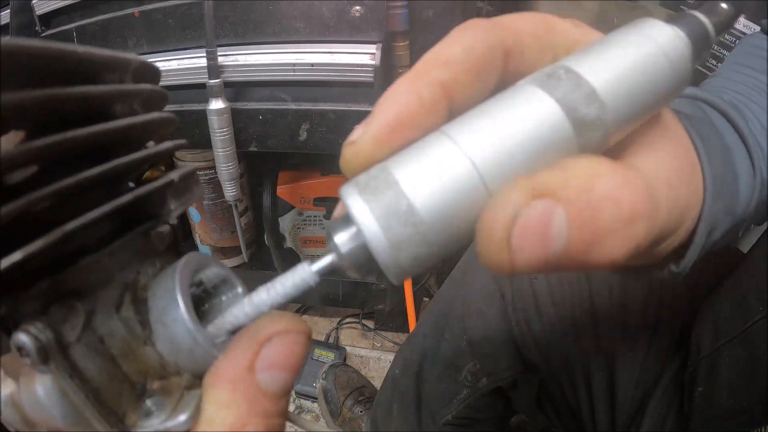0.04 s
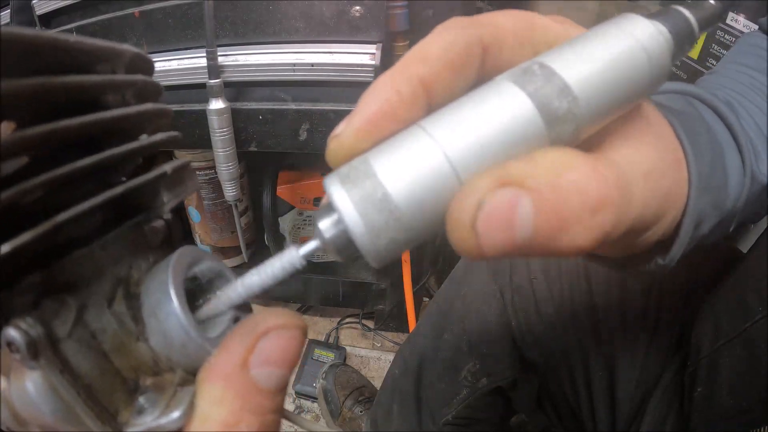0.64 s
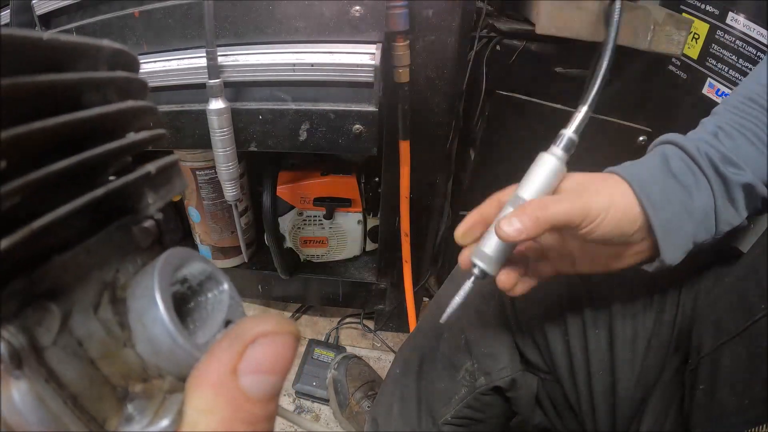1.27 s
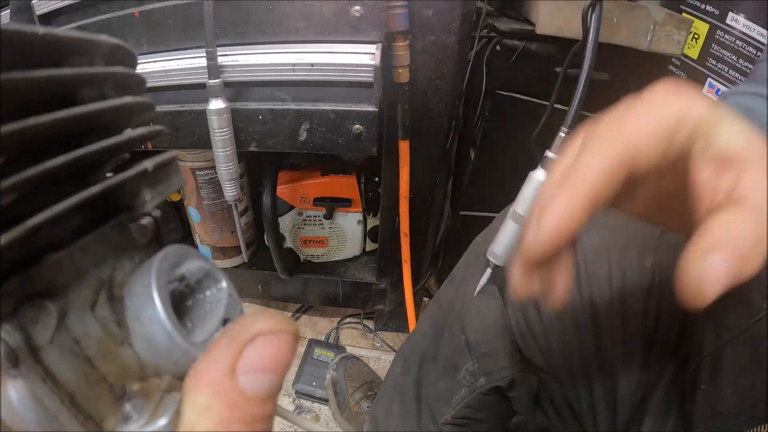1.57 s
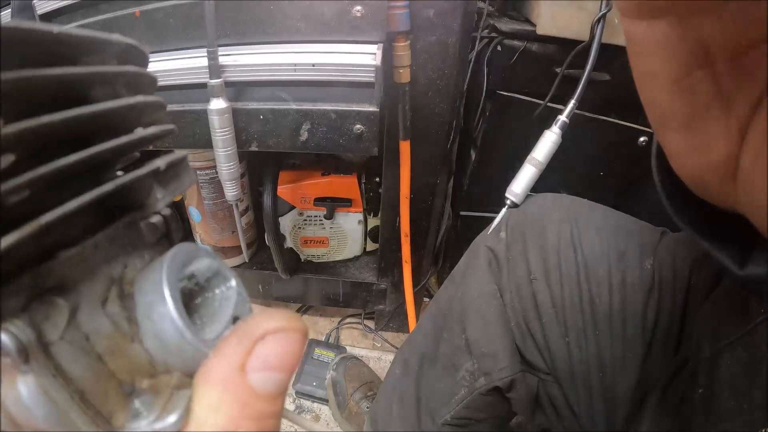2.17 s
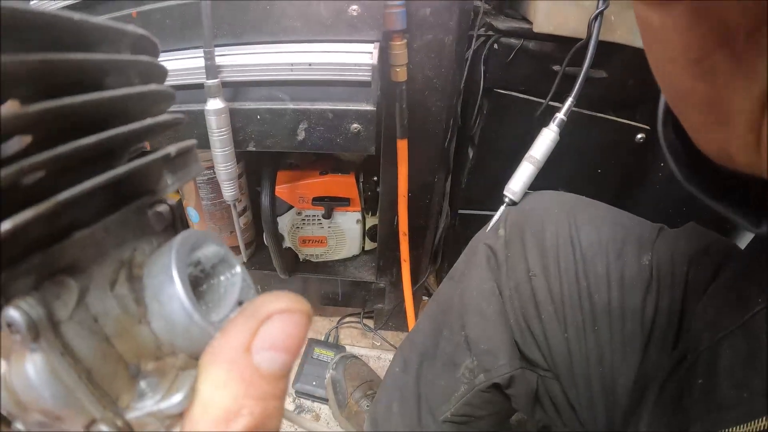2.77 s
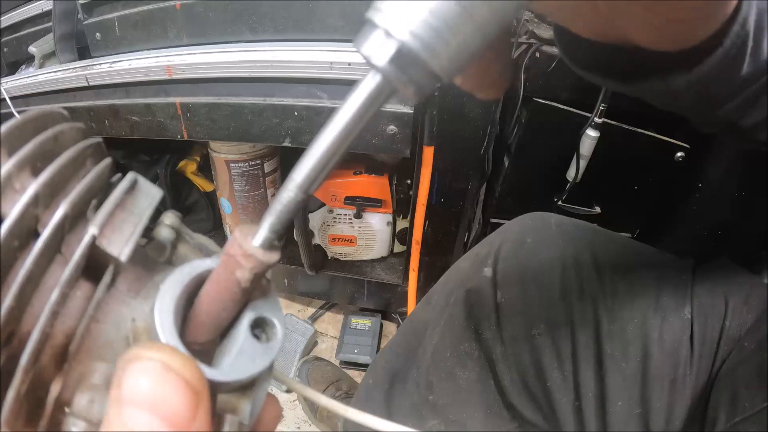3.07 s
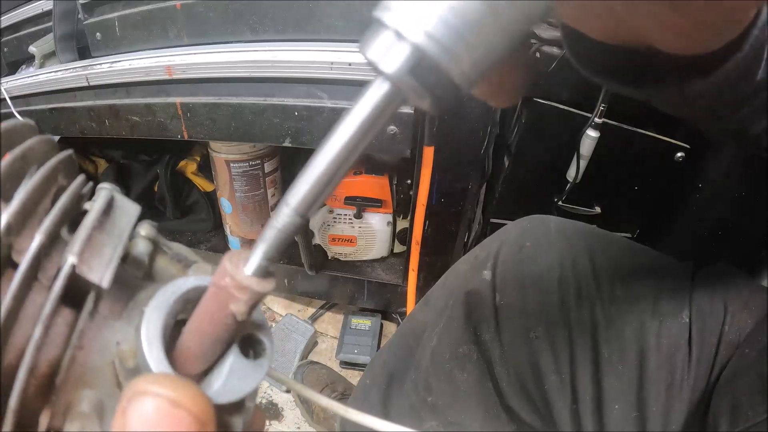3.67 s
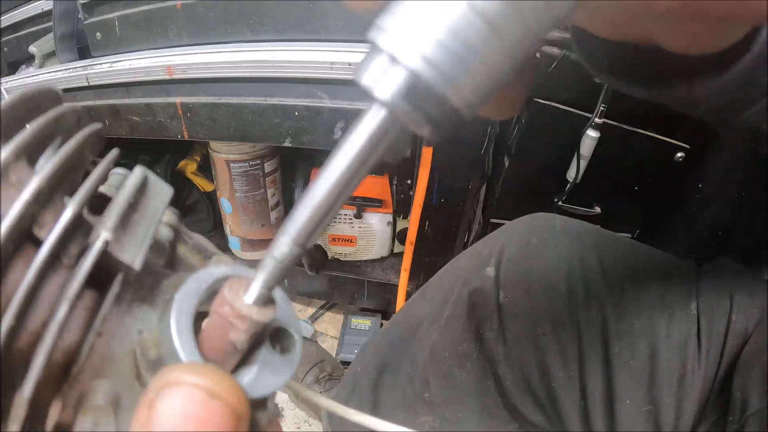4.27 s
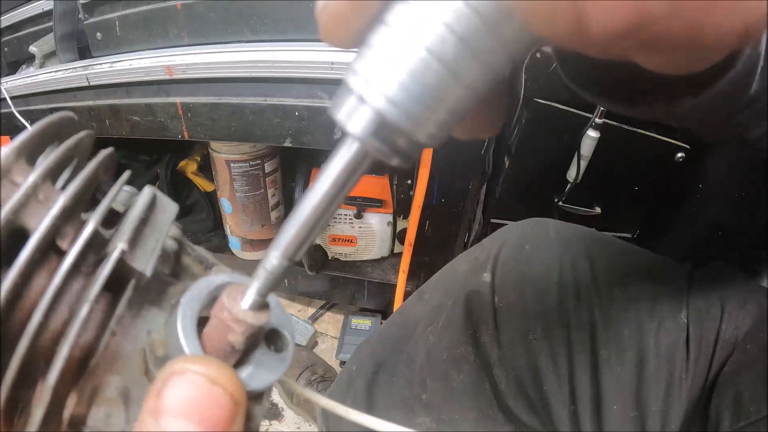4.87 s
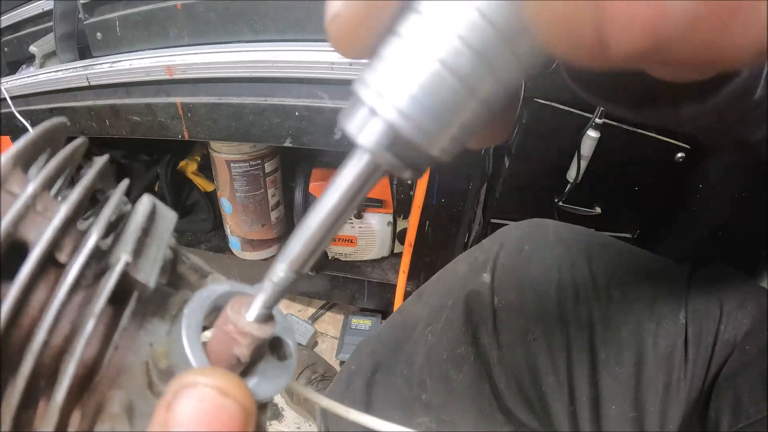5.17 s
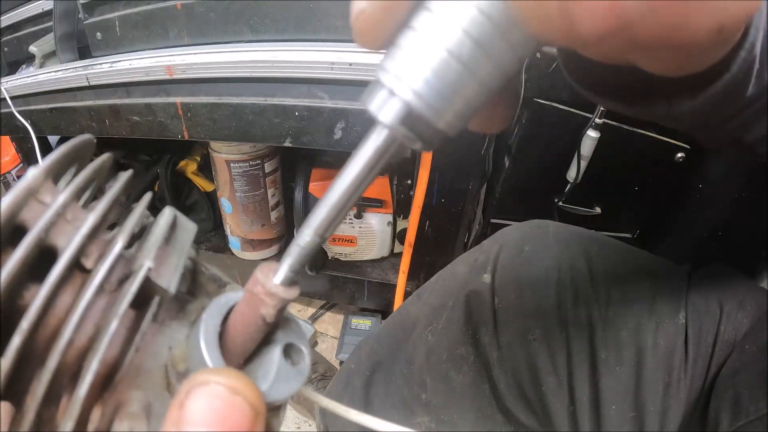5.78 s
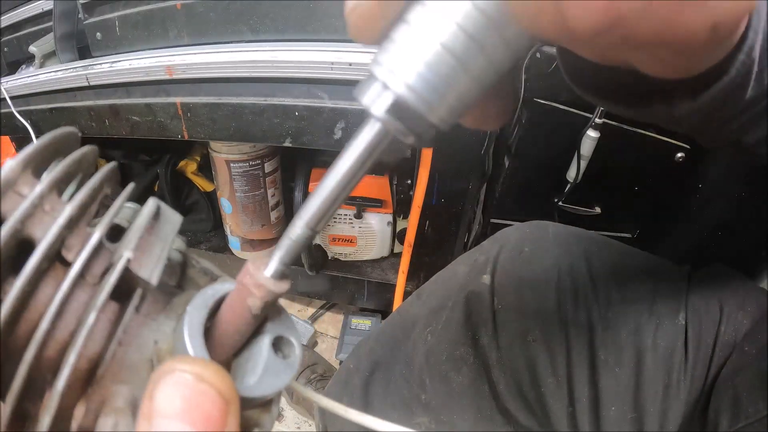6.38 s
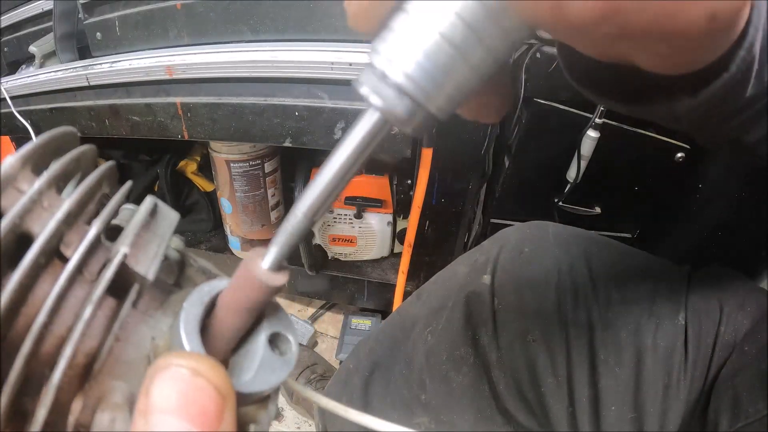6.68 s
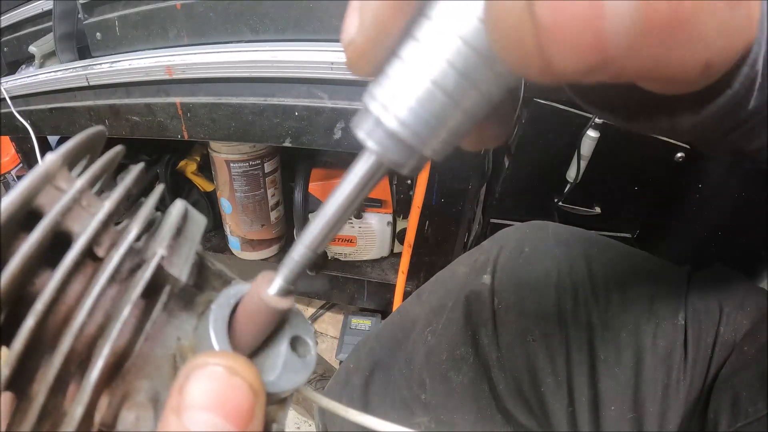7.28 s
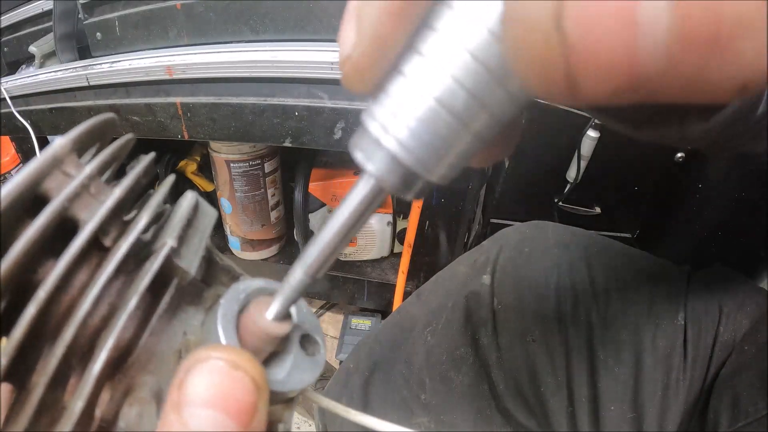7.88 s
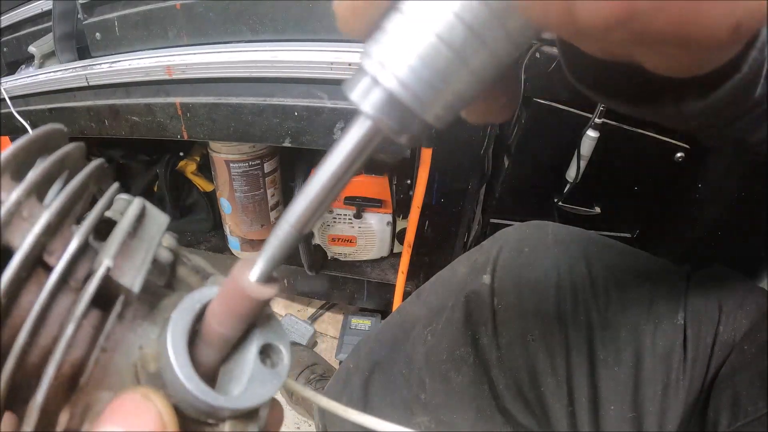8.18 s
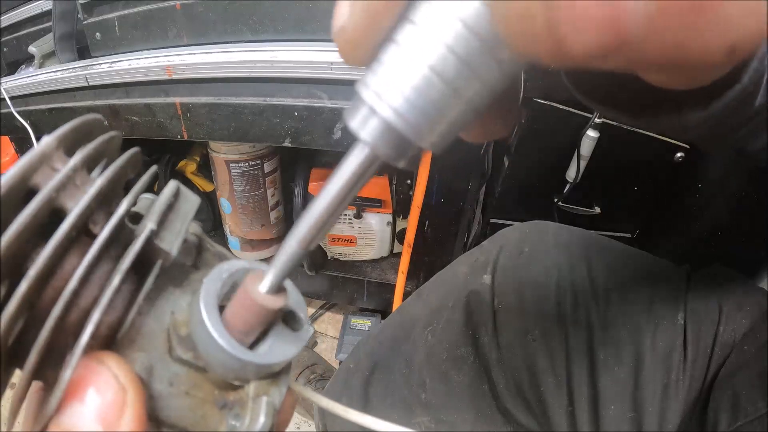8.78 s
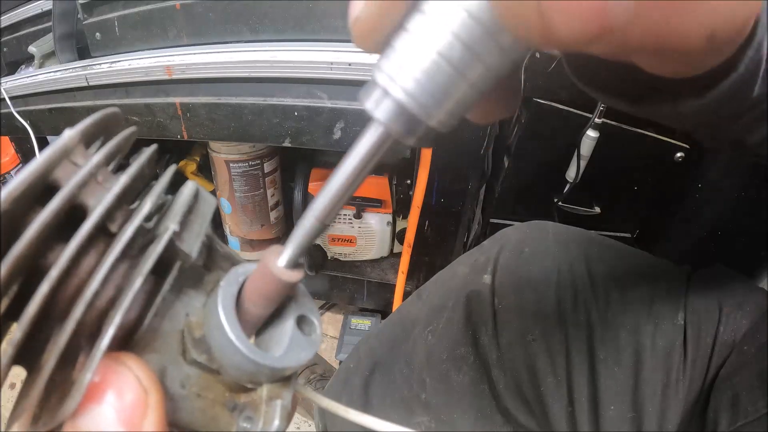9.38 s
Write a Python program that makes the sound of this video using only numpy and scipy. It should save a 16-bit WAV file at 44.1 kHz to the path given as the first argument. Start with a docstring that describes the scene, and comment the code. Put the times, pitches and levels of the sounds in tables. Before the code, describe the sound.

Close grinding on a finned metal cylinder, a pause with handling thumps and light scraping, then rough rotary sanding that squeals and chatters.

```python
"""Workshop, close to a head-worn camera: a flexible-shaft grinder works a finned engine cylinder's port.
A burr chips at the wall and lifts off, leaving the fins ringing. A sleeve brushes past, a hand bumps
the camera, and the sound cuts out briefly for the bit change. A sanding roll is scraped into the
port, spins up, rasps against the wall once a turn, squeals and chatters. Low hum and air lie beneath."""
import sys
import numpy as np
from scipy import signal
from scipy.fft import rfft, irfft, next_fast_len
from scipy.io import wavfile
from scipy.ndimage import uniform_filter1d, map_coordinates

SR = 44100
rng = np.random.default_rng(int(sys.argv[2]) if len(sys.argv) > 2 else 0)


def file_out(sig):
    """Save sig as 16-bit WAV at sys.argv[1]."""
    # one column per channel
    cols = np.atleast_2d(sig).T
    # limit, then scale
    lim = np.clip(cols, -1, 1)
    pcm = np.round(lim * 32767).astype(np.int16)
    wavfile.write(sys.argv[1], SR, pcm)


N = 425124
TIME = np.arange(N) / SR
CHATTER_START_S = 8.503  # the roll starts to bounce clear and knock once a turn

# Each row: time in seconds, cutting level in dB, fin drive in relative dB.
BURR_LEVELS = [(0.0, -28.5, -1.5), (0.116, -29, -10), (0.148, -23, -10), (0.26, -32, -4.5),
               (0.36, -24.5, -8), (0.57, -29, -9.5), (0.672, -22.5, -10), (0.774, -35, -18),
               (0.806, -26, -5), (0.888, -26.5, -6), (0.93, -23, -11), (1.03, -32, -12.5)]
# The burr digs in. Each row: start in seconds, added force in dB relative to the steady cut.
BURR_BITES = [(0.077, 2.5), (0.339, -5.5), (0.535, 2), (0.798, 4)]
# Each row: time in seconds, rasp level in dB, fine grit in relative dB.
ROLL_LEVELS = [(6.77, -31.5, -4), (6.84, -28, -2.5), (7.03, -26.5, -6.5), (7.09, -29.5, 3),
               (7.17, -28, -5.5), (7.39, -30.5, -4.5), (7.53, -26, -5), (7.8, -28.5, -4), (8.07, -25, -5.5),
               (8.2, -29.5, 2.5), (8.45, -28.5, -5), (8.55, -32, 2.5), (8.67, -35, 0.5), (8.83, -24.5, -6),
               (8.96, -29, -3), (9.17, -24.5, -9), (9.27, -25, -2.5), (9.37, -24.5, -8), (9.63, -27.5, 0.5)]
# Each row: time in seconds, turns per second, fade of contact within a turn in dB.
ROLL_SPIN = [(6.77, 32.2, 6.5), (7.3, 32, 13), (7.6, 39.4, 7), (7.85, 45, 11.5), (8.2, 41.5, 4.5),
             (8.5, 49, 14), (8.7, 47, 13), (8.85, 56, -5), (9.25, 50, -3), (9.64, 42, 6)]
# The roll sticks. Each row: start in seconds, end in seconds, level in dB.
SQUEAL_SPANS = [(7.062, 7.201, -25.5), (7.486, 7.747, -34), (7.965, 8.041, -25.5), (8.768, 8.876, -29.5),
                (9.56, 9.7, -50)]
# Stick-slip resonances of the wall. Each row: frequency in Hz, width in Hz, gain in dB.
SQUEAL_MODES = [(3382, 25, -2), (4170, 50, -5), (5345, 70, 0), (7330, 200, -7)]
# Moving resonances. Each row: time in seconds, centre in Hz.
HOLLOW_PITCH = [(6.77, 1430), (6.95, 1265), (7.85, 1300), (8.45, 1245), (8.58, 1550), (8.8, 1275),
                (9.64, 1336)]  # shifts as the roll moves in the port
KNOCK_PITCH = [(7.9, 1500), (8.2, 2920), (8.45, 2590), (8.52, 1900)]  # shifts as the cylinder tilts
# Each row: start in seconds, length in seconds, rasp level in dB, fine grit in relative dB,
# swell over the stroke in dB, port resonance in Hz.
SCRAPE_STROKES = [(3.503, 0.1, -54, -2, -4.5, 1760), (3.845, 0.063, -54.5, -6.5, 7, 1780),
                  (3.91, 0.088, -58, -15, 1, 1770), (4.003, 0.069, -44, -6.5, 9, 1600),
                  (4.078, 0.15, -55.5, -2.5, 8, 1340), (4.319, 0.11, -64, 5, 3, 1600),
                  (4.392, 0.034, -47, -8, -6, 1450), (4.457, 0.034, -54.5, -5.5, 9, 1490),
                  (4.635, 0.1, -60, -6, -7, 1780), (4.789, 0.039, -59.5, -9, 1, 1750),
                  (5.132, 0.028, -72, 15.5, -2, 1700), (5.504, 0.027, -68, 19, 2, 1700),
                  (5.549, 0.039, -45, -8, -3, 1430), (5.761, 0.016, -46, -4, -2, 1600),
                  (5.879, 0.065, -58, -9, -14, 1770), (5.992, 0.093, -56.5, -1.5, -2, 1600),
                  (6.083, 0.057, -53, 5, 10, 1650), (6.212, 0.031, -50, -7.5, 13, 1850),
                  (6.306, 0.045, -50, -7.5, -6, 1820), (6.392, 0.43, -57.5, -6, 0.5, 1530),
                  (6.582, 0.051, -44, 0, 4, 1380), (6.625, 0.044, -37, -4, 3, 1350),
                  (6.722, 0.025, -35, -3.5, 5, 1447)]
# Each row: start in seconds, level in dB, body in relative dB.
WALL_KNOCKS = [(3.0061, -34, -13), (4.4206, -32, -11), (4.657, -29, -14), (4.8122, -29, -16),
               (5.047, -41, -17), (5.1277, -35, -27), (6.4631, -30, -19), (6.707, -31, 3),
               (6.768, -13, -11), (7.3175, -6, -19.5), (7.336, -9, -15), (8.1478, -10, -15.5),
               (8.1612, -12, -8), (8.2475, -12, -7), (8.3458, -12, -6), (8.3541, -10, -5),
               (8.4376, -13, -9), (8.457, -11, -7), (8.6291, -11, -4)]
# Each row: frequency in Hz, T60 in seconds, then gains in dB when driven at the port mouth,
# driven deep in the port and struck on the rim.
FIN_MODES = [(2056, 1.4, -22, -23, -17), (2175, 0.8, -15, -17, -10), (2299, 0.6, -11, -16, -12),
             (2320, 0.75, -5, -16, -3), (2547, 1.1, -10, -16, -3), (3004, 0.6, -22, -20, -17),
             (3133, 0.6, -25, -22, -27), (3382, 0.32, -22, -13, -9), (3510, 0.35, -24, -26, -9),
             (3655, 0.45, -11, -18, 0), (3924, 0.2, -13, -26, -28), (4210, 0.18, -7, -14, -16),
             (4618, 0.2, -23, -19, -26), (4974, 0.36, -11, -23, -15), (5880, 0.15, -16, -13, -30),
             (5911, 0.55, -22, -28, -24), (6697, 0.2, -18, -21, -22), (7887, 0.15, -14, -18, -24),
             (8339, 0.12, -15, -29, -30)]
# The bit catches the rim. Each row: time in seconds, level in dB.
RIM_BLOWS = [(1.02, -46), (4.05, -62), (5.555, -60), (5.764, -64)]
# The tool locks onto one fin mode. Each row: start in seconds, length in seconds, mode in Hz, level in dB.
FIN_NOTES = [(0.21, 0.15, 2547, -32.5), (0.32, 0.077, 2320, -25.5), (0.82, 0.027, 2320, -30),
             (2.9, .03, 2547, -61), (4.057, 0.045, 2547, -49.5), (5.146, .03, 2547, -69),
             (7.036, .28, 2547, -33), (7.998, .08, 2547, -32.5), (8.43, 0.09, 2320, -33.5),
             (8.51, 0.15, 4210, -37.5), (8.88, 0.29, 2547, -33)]
# Each row: start in seconds, length in seconds, rustle level in dB, fibre hiss in relative dB.
SLEEVE_BRUSHES = [(1.489, 0.029, -70, 11.5), (1.72, 0.27, -46, -11.5), (1.844, 0.064, -42.5, -21),
                  (2.064, 0.3, -61.5, -7.5), (2.548, 0.18, -62.5, -11), (2.879, 0.2, -65.5, 2),
                  (4.11, 0.16, -54.5, -10)]
# Each row: start in seconds, length in seconds, sway level in dB, housing rub in relative dB.
CAMERA_GRIPS = [(1.93, 0.086, -25.5, -20.5), (2.082, 0.043, -23, -19), (2.212, 0.16, -31, -37),
                (2.521, 0.2, -25, -22), (2.932, 0.15, -38.5, -5.5), (4.13, 0.19, -33, -13),
                (5.692, 0.3, -43, -15)]
# Each row: time in seconds, click level in dB, thud level in dB.
CAMERA_TAPS = [(1.908, -23.5, -40), (1.929, -30, -25), (2.11, -34, -11.5), (2.155, -40, -23),
               (2.699, -13, -18)]
# Noise spectra. Each row: frequency in Hz, relative density in dB.
CHIP_SPECTRUM = [(59, -36), (100, -4), (268, -0.5), (620, -16.5), (923, -3), (2270, -3.5), (2690, -9.5),
                 (4090, -11.5), (4540, -25), (4840, -11), (6400, -13.5), (7300, -7), (8900, -19),
                 (9860, -10.5), (11000, -31), (12700, -20), (15000, -59.5)]
RASP_SPECTRUM = [(250, -36), (550, -17), (1050, -8.5), (1250, -3), (1500, 5), (2200, -1), (3500, -5.5),
                 (4200, -19.5), (5300, -6.5), (6400, -14), (7300, -8), (9500, -17.5), (12300, -19.5),
                 (15500, -47)]
SCRAPE_SPECTRUM = [(300, -37), (700, -12.5), (950, -10), (1300, 5.5), (1900, 2.5), (2800, -2), (4100, -9),
                   (5500, 2.5), (6500, -3.5), (7500, 3), (9500, -8), (12500, -11), (15500, -27)]
CLOTH_SPECTRUM = [(150, -20), (330, -0.5), (700, -5.5), (1200, -4.5), (2400, -10.5), (6000, -13),
                  (7400, -15), (9500, -20.5), (12400, -28.5), (14500, -56.5)]
TAP_SPECTRUM = [(150, -3.5), (700, -16.5), (1500, -14), (2550, -8), (3500, -25.5), (8000, -32),
                (15000, -40)]
SWAY_SPECTRUM = [(12, 5), (55, -2), (100, -12), (150, -15), (240, -30), (500, -76), (2000, -120)]
RUB_SPECTRUM = [(70, -20), (150, 4.5), (240, -2.5), (400, -15.5), (1400, -40), (4000, -49.5), (12000, -86)]
SHAKE_SPECTRUM = [(15, -14), (27, 3.5), (45, 1.5), (75, -9), (200, -15.5), (400, -24.5), (900, -60.5)]
AIR_SPECTRUM = [(180, -33.5), (280, 4), (750, -8.5), (7060, -15.5), (12100, -23.5), (15000, -51.5)]
# Each row: frequency in Hz, left-right correlation.
EAR_CORRELATION = [(60, 0.74), (300, 0.87), (1400, 0.84), (7000, 0.82), (13000, 0.24)]
# Each row: frequency in Hz, left over right in dB.
BURR_BALANCE = [(60, 7), (240, -3.5), (950, -3), (3770, 3.5), (15000, 4)]
ROLL_BALANCE = [(60, -3), (240, -6), (950, -2.5), (3770, 1), (15000, 3.5)]
HAND_BALANCE = [(60, -6), (1000, -4), (4000, -1), (13000, 6)]

FIN_HZ, FIN_T60_S, FIN_MOUTH_DB, FIN_DEEP_DB, FIN_RIM_DB = np.transpose(FIN_MODES)


def burr(turn_hz=144, body_db=-5.5, fine_db=-8, ring_db=4.0, lift_s=1.034, fade_db_per_s=293):
    """The fast burr skips on the wall, tears off chips in uneven bursts, then lifts off."""
    press_db, drive_db = curves(BURR_LEVELS)
    cut_db = press_db - fade_db_per_s * np.clip(TIME - lift_s, 0, 1)
    turns = np.cumsum(turn_hz * (1 + .02 * wobble(20))) / SR
    skip_db = 1.5 * np.cos(2 * np.pi * turns) + 3 * np.clip(wobble(420), -2, 2)
    bite = unit(amp(skip_db)) * amp(cut_db)
    bite *= 1 + sum(amp(db) * burst(start_s, t60_s=0.033) for start_s, db in BURR_BITES)
    chips = grains(rate_hz=1800, spread_db=1.5) * bite
    dust = grains(rate_hz=7000, spread_db=4.5) * bite
    cut = abrasion(chips * amp(body_db), dust * amp(fine_db), CHIP_SPECTRUM)
    return cut + fins(chips * amp(drive_db + ring_db), FIN_MOUTH_DB)


def sanding_roll(body_db=-5.5, fine_db=0.5, squeal_db=-10, tilt_ring_db=-6, thud_db=-7, hollow_db=-3):
    """The off-centre roll slaps the wall once a turn, drags its grit along, sticks and squeals."""
    rasp_db, grit_db = curves(ROLL_LEVELS)
    turn_hz, bounce_db = curves(ROLL_SPIN)
    turns = np.cumsum(turn_hz * (1 + 0.031 * wobble(30))) / SR
    turns -= np.interp(CHATTER_START_S, TIME, turns)  # high side meets the wall as the chatter starts
    contact = unit(uniform_filter1d(amp(-bounce_db * (turns % 1 - .5)), size=90))
    snag = snags(rate_hz=105, fall_db=14, spread_db=1)
    running = during(6.768, 11, .003)
    press = contact * amp(rasp_db) * running
    # big grains tick over the hiss of the small ones
    catches = grains(rate_hz=1500, spread_db=0) * press * snag
    grit = grains(rate_hz=8000, spread_db=3.5) * press
    grit *= unit(snag ** 0.57 * amp(3.2 * wobble(300)))
    rasp = abrasion(catches * amp(body_db), grit * amp(grit_db + fine_db), RASP_SPECTRUM)
    stick = amp(rasp_db + squeal_db) * running
    stick += sum(amp(db) * during(start_s, end_s, 0.0096) for start_s, end_s, db in SQUEAL_SPANS)
    slips = snags(rate_hz=65, fall_db=12, spread_db=1)
    squeal = resonate(noise() * contact * slips, SQUEAL_MODES) * stick
    hollow = port_hollow(catches, curves(HOLLOW_PITCH)[0], width_hz=140, band_hz=(850, 2200))
    # cylinder tilted: the roll chatters higher and thuds in the hand
    bumps = grains(rate_hz=280, spread_db=0.5) * contact
    thud = resonate(bumps, [(185.2, 72, 6.5), (8500, 690, -1.5)]) * amp(rasp_db + thud_db)
    tilted = (amp(tilt_ring_db) * knock_ring(catches) + thud) * during(8.17, 8.48, 0.075)
    return rasp + amp(hollow_db) * hollow + squeal + tilted + fins(catches, FIN_DEEP_DB)


def scrapes(body_db=-5, fine_db=1, ring_db=-11, hollow_db=-1, drag_db=-71, ring_db_per_octave=-5):
    """The resting roll slips along the port mouth in short, gritty strokes, dragging lightly between."""
    drag = amp(drag_db) * (during(3.7, 5, .2) + during(5.7, 6.75, .2))
    coarse, fine = drag.copy(), drag.copy()
    centre_hz = np.full(N, SCRAPE_STROKES[0][-1], float)
    for start_s, length_s, rasp_db, grit_db, swell_db, hollow_hz in SCRAPE_STROKES:
        end_s = start_s + length_s
        near = slice(int((start_s - .01) * SR), int((start_s + 1) * SR))
        stroke = np.maximum(during(start_s, end_s, length_s / 10), 0.57 * burst(end_s, t60_s=0.037))
        progress = np.clip((TIME[near] - start_s) / length_s, 0, 1)
        stroke = stroke[near] * amp(swell_db * (progress - .5))
        coarse[near] += amp(rasp_db) * stroke
        fine[near] += amp(rasp_db + grit_db) * stroke
        centre_hz[near] = hollow_hz
    force = unit(grains(rate_hz=2200, spread_db=3) * snags(rate_hz=170, fall_db=12, spread_db=2))
    rasp = abrasion(force * coarse * amp(body_db), force * fine * amp(fine_db), SCRAPE_SPECTRUM)
    hollow = port_hollow(force * coarse, centre_hz, width_hz=320, band_hz=(1000, 2800))
    # light contact stirs mainly the low modes
    soft_db = FIN_MOUTH_DB + ring_db_per_octave * np.log2(FIN_HZ / FIN_HZ[0])
    return rasp + amp(hollow_db) * hollow + amp(ring_db) * fins(force * (coarse + fine), soft_db)


def knocks(body_db=1, fine_db=-7, ring_db=-15, hollow_db=2, chatter_db=-16.5, chatter_body_db=-5):
    """The bit hits the wall: single knocks and a run of six, one a turn."""
    turn_s = 1 / np.interp(CHATTER_START_S, TIME, curves(ROLL_SPIN)[0])
    chatter = [(CHATTER_START_S + k * turn_s, chatter_db, chatter_body_db) for k in range(6)]
    coarse, fine = np.zeros((2, N))
    for start_s, db, thud_db in list(WALL_KNOCKS) + chatter:
        blow = amp(db) * burst(start_s, t60_s=0.0097)
        coarse += amp(thud_db) * blow
        fine += blow
    force = np.sign(noise())
    knock = abrasion(force * coarse * amp(body_db), force * fine * amp(fine_db), SCRAPE_SPECTRUM)
    hollow = amp(hollow_db) * knock_ring(force * coarse)
    return knock + hollow + amp(ring_db) * fins(force * fine, FIN_DEEP_DB)


def abrasion(coarse, fine, spectrum, crossover_hz=3600):
    """Contact noise: coarse grains make the body, fine ones the treble."""
    low, high = (signal.butter(3, crossover_hz, kind, fs=SR, output="sos") for kind in ("low", "high"))
    body = colour(coarse, spectrum, (800, 2000))
    fizz = colour(fine, spectrum, (5500, 13000))
    return signal.sosfilt(low, body) + signal.sosfilt(high, fizz)


def grains(rate_hz, spread_db):
    """Tiny random impacts of uneven size, rms 1."""
    at = np.flatnonzero(rng.random(N) < rate_hz / SR)
    size = amp(spread_db * np.clip(rng.standard_normal(N)[at], -2, 2))
    impacts = np.zeros((2, N))
    impacts[:, at] = size * np.sign(rng.random((2, N))[:, at] - .5)
    return unit(impacts)


def snags(rate_hz, fall_db, spread_db):
    """Grit catches at uneven moments, each catch fading until the next; rms 1."""
    count = np.cumsum(rate_hz * amp(3 * wobble(60))) / SR
    sizes = np.clip(rng.standard_normal(N), -1.5, 1.5)
    level_db = spread_db * sizes[count.astype(int)] - fall_db * (count % 1)
    return unit(uniform_filter1d(amp(level_db), size=30))


def fins(force, gains_db):
    """The cooling fins store each blow and ring on."""
    t = np.arange(SR) / SR
    ring = np.zeros(SR)
    for hz, t60_s, db in zip(FIN_HZ, FIN_T60_S, gains_db):
        mode = np.sin(2 * np.pi * hz * t) * amp(-60 * t / t60_s)
        ring += amp(db) * mode / np.linalg.norm(mode)
    return signal.fftconvolve(force, ring[None], axes=1)[:, :N]


def fin_tones(waver_db=1.5, drift_hz=4, attack_s=.04):
    """Rim blows ring all fin modes; steady rubbing builds up one, which rings out at its own rate."""
    blows = np.zeros((1, N))
    for start_s, db in RIM_BLOWS:
        blows[0, round(start_s * SR)] = amp(db) * np.sqrt(SR / 10)
    sound = fins(blows, FIN_RIM_DB)[0]
    drift_cycles = drift_hz * np.cumsum(wobble(40)) / SR
    waver = amp(waver_db * wobble(35))
    for start_s, length_s, hz, db in FIN_NOTES:
        mode = np.argmin(abs(FIN_HZ - hz))
        near = slice(max(0, int((start_s - .1) * SR)), int((start_s + 1.5) * SR))
        level = amp(db) * swell(start_s, length_s, attack_s, FIN_T60_S[mode]) * waver
        cycles = FIN_HZ[mode] * TIME[near] + drift_cycles[near] + rng.random()
        sound[near] += level[near] * np.sin(2 * np.pi * cycles)
    return sound


def port_hollow(force, centre_hz, width_hz, band_hz):
    """The port cavity: one resonance with a moving centre, band-passed."""
    carrier = np.exp(2j * np.pi * np.cumsum(centre_hz) / SR)
    pole = np.exp(-np.pi * width_hz / SR)
    baseband = signal.lfilter([np.sqrt(2 * (1 - pole ** 2))], [1, -pole], force / carrier)
    bandpass = signal.butter(2, band_hz, "band", fs=SR, output="sos")
    return signal.sosfilt(bandpass, np.real(baseband * carrier))


def knock_ring(force):
    """The port answers a hard contact with a short note."""
    return port_hollow(force, curves(KNOCK_PITCH)[0], width_hz=300, band_hz=(1200, 3600))


def squeak(fundamental_hz=3010, level_db=-65):
    """The roll squeaks thinly on entering the port: harmonics 2 and 3 only."""
    phase = 2 * np.pi * np.cumsum(fundamental_hz * (1 + 0.026 * wobble(1500))) / SR
    tone = np.sin(2 * phase) + .3 * np.sin(3 * phase)
    return amp(level_db) * tone * during(3.368, 3.44, 0.013)


def shaft_shake(burr_db=-35.5, roll_db=-38, throb_db=-37):
    """The running shaft shakes worker and camera; the off-centre roll throbs once a turn."""
    drive = amp(burr_db) * during(-1, 1.15, 0.36) + amp(roll_db) * during(6.71, 11, 0.3)
    rumble = colour(noise(), SHAKE_SPECTRUM, (20, 600)) * drive
    turns = np.cumsum(curves(ROLL_SPIN)[0]) / SR
    throb = amp(throb_db) * np.sin(2 * np.pi * turns) * during(6.9, 11, 0.26)
    return (rumble + [throb, np.zeros(N)]) * amp(2.5 * wobble(7))


def sleeve(stir_db=-73, slide_db=-67, scuff_db=-3):
    """Cloth brushes by the microphones, hisses where it slides and stirs as the arm moves."""
    stir = amp(stir_db) * (during(1.05, 1.4, .1) + during(2.9, 3.3, .1))
    rustle, hiss = stir.copy(), stir.copy()
    for start_s, length_s, db, hiss_db in SLEEVE_BRUSHES:
        brush = amp(db) * swell(start_s, length_s, attack_s=0.054, t60_s=0.17)
        rustle += brush
        hiss += amp(hiss_db) * brush
    force = unit(grains(rate_hz=4500, spread_db=4) * amp(2.5 * wobble(160)))
    sliding = amp(slide_db) * during(2.11, 2.375, 0.017)
    slide = resonate(force, [(7200, 400, -5), (11900, 340, -5)]) * sliding
    firmness = rustle ** 2 / rustle.max()  # only a firm brush rings the housing
    scuff = resonate(force, [(1110, 130, -0.5), (2450, 220, -5)]) * amp(scuff_db) * firmness
    return abrasion(force * rustle, force * hiss, CLOTH_SPECTRUM) + slide + scuff


def handling(scuff_db=-8, click_db=8, thud_hz=65):
    """Grips sway and rub the camera; cuff and finger taps click, scuff and thud as its body gives."""
    sway, rub, clicks, scuffs, thuds = np.zeros((5, N))
    for start_s, length_s, db, rub_db in CAMERA_GRIPS:
        grip = amp(db) * swell(start_s, length_s, attack_s=0.0214, t60_s=0.33)
        sway += grip
        rub += amp(rub_db) * grip
    for start_s, db, thud_db in CAMERA_TAPS:
        clicks[round(start_s * SR)] = amp(db + click_db)
        scuffs += amp(db + scuff_db) * burst(start_s, t60_s=0.016)
        flex = np.sin(2 * np.pi * thud_hz * (TIME - start_s))
        thuds -= amp(thud_db) * burst(start_s, t60_s=0.051) * flex
    taps = colour(noise() * scuffs + [clicks, np.zeros(N)], TAP_SPECTRUM, (700, 9000))
    return housing(sway, rub) + taps + [thuds, np.zeros(N)]


def housing(sway, rub):
    """The camera body rumbles as it sways and murmurs where it is rubbed."""
    rumble = colour(noise(), SWAY_SPECTRUM, (20, 90)) * sway
    return rumble + colour(noise(), RUB_SPECTRUM, (170, 500)) * rub


def hum(hz=42.7, level_db=-51, waver_db=5.5):
    """A low, wavering hum under the work."""
    phase = 2 * np.pi * np.cumsum(hz * (1 + .02 * wobble(4))) / SR
    return np.sin(phase) * amp(level_db + waver_db * wobble(5.1))


def workshop_air(level_db=-68):
    """Quiet, steady room noise."""
    return amp(level_db) * colour(noise(), AIR_SPECTRUM, (300, 15000))


def amp(db):
    """Decibels to gain."""
    return 10 ** (np.asarray(db) / 20)


def unit(x):
    """Scale to rms 1."""
    return x / np.sqrt(np.mean(x ** 2) + 1e-20)


def noise():
    """Two unrelated white noises."""
    return rng.standard_normal((2, N))


def wobble(rate_hz):
    """Smooth random curve with knots at rate_hz."""
    return map_coordinates(rng.standard_normal(int(N * rate_hz / SR) + 4), [TIME * rate_hz], order=2)


def along(points, hz):
    """Interpolate (Hz, value) points on a log axis."""
    knots_hz, values = np.transpose(points)
    return np.interp(np.log(hz + 1), np.log(knots_hz), values)


def curves(rows):
    """One value per sample for each column after the time."""
    times_s, *columns = np.transpose(rows)
    return [np.interp(TIME, times_s, column) for column in columns]


def during(start_s, end_s, fade_s):
    """Gate with linear ramps."""
    return np.clip(np.minimum(TIME - start_s, end_s - TIME) / fade_s + .5, 0, 1)


def burst(start_s, t60_s):
    """Envelope of one short contact."""
    return (TIME >= start_s) * amp(-60 * np.clip((TIME - start_s) / t60_s, 0, 10))


def swell(start_s, length_s, attack_s, t60_s):
    """Envelope of one gesture: rise, hold, decay."""
    rise = np.clip((TIME - start_s) / attack_s + .5, 0, 1)
    return rise * amp(-60 * np.clip((TIME - start_s - length_s) / t60_s, 0, 10))


def filtered(x, response):
    """Apply a complex frequency response."""
    size = next_fast_len(N + SR // 2, True)
    return irfft(rfft(x, size) * response(np.fft.rfftfreq(size, 1 / SR)), size)[..., :N]


def resonate(x, modes):
    """Parallel resonances (centre Hz, width Hz, dB); output rms 1."""
    return unit(filtered(x, lambda hz: sum(
        amp(db) * 1j * hz * width_hz / (centre_hz ** 2 - hz ** 2 + 1j * hz * width_hz)
        for centre_hz, width_hz, db in modes)))


def colour(x, spectrum, band_hz, size=8192):
    """Minimum-phase filter; white input of rms 1 gives rms 1 inside the band."""
    hz = np.fft.rfftfreq(size, 1 / SR)
    gain = amp(along(spectrum, hz))
    gain /= np.sqrt(np.mean(gain ** 2 * (hz > band_hz[0]) * (hz < band_hz[1])))
    cepstrum = irfft(np.log(gain + 1e-6))
    cepstrum[1:size // 2] *= 2
    cepstrum[size // 2 + 1:] = 0
    impulse = irfft(np.exp(rfft(cepstrum)))
    return signal.oaconvolve(x, impulse[None], axes=1)[:, :N]


def place(pair, balance):
    """Mix a mid/side pair to partly correlated ears, leaning to one side."""
    size = next_fast_len(N + SR // 8, True)
    hz = np.fft.rfftfreq(size, 1 / SR)
    angle = np.arccos(np.clip(along(EAR_CORRELATION, hz), 0, 1)) / 2
    mid, side = rfft(pair, size) * [np.cos(angle), np.sin(angle)]
    lean = amp(along(balance, hz) / 2)
    return irfft(np.array([(mid + side) * lean, (mid - side) / lean]), size)[:, :N]


def scene():
    """Tool, hands and workshop air in stereo."""
    roll = place(sanding_roll() + scrapes() + knocks() + shaft_shake(), ROLL_BALANCE)
    hands = place(sleeve() + handling(), HAND_BALANCE)
    head = place(housing(sway=amp(-51), rub=amp(-65)), ROLL_BALANCE)  # never quite still
    air = workshop_air()
    return place(burr(), BURR_BALANCE) + fin_tones() + roll + squeak() + hum() + hands + head + air


def record(dry, stop_s=2.796, resume_s=2.898, ceiling=.6, top_hz=15500):
    """The camera stops briefly for the bit change, rounds off peaks and limits the band."""
    sound = dry * (1 - during(stop_s, resume_s, 1 / SR))
    sound = sound / (1 + (sound / ceiling) ** 6) ** (1 / 6)
    return filtered(sound, lambda hz: 1 / (1 + (hz / top_hz) ** 400))


dry = scene()
out = record(dry)
file_out(out)
```